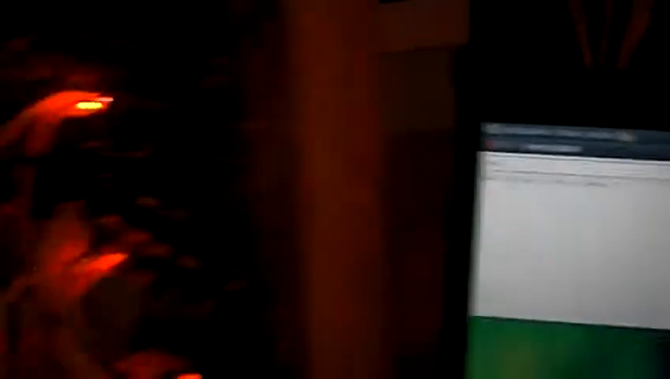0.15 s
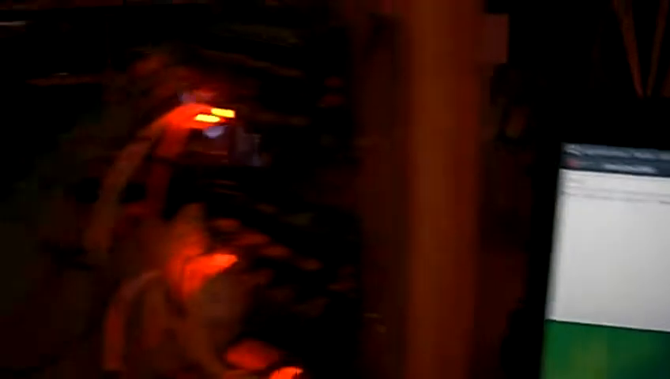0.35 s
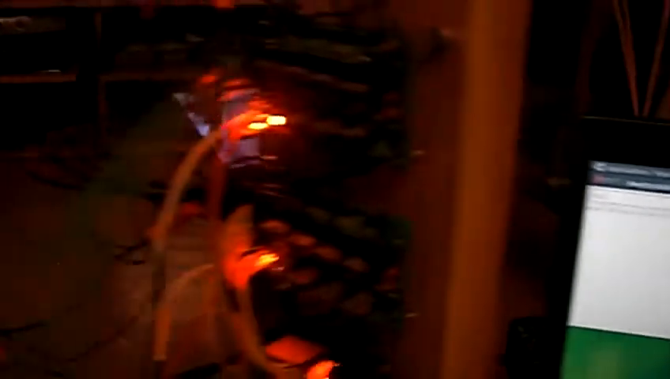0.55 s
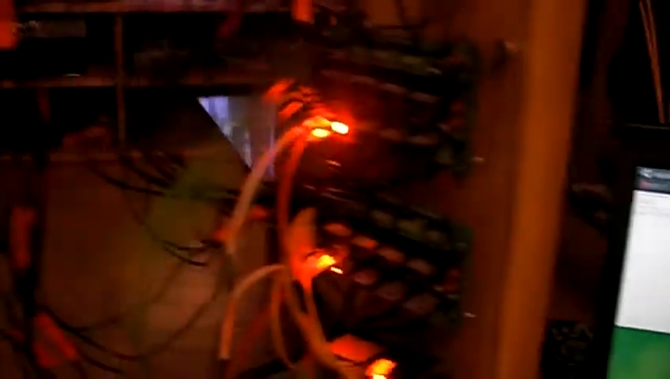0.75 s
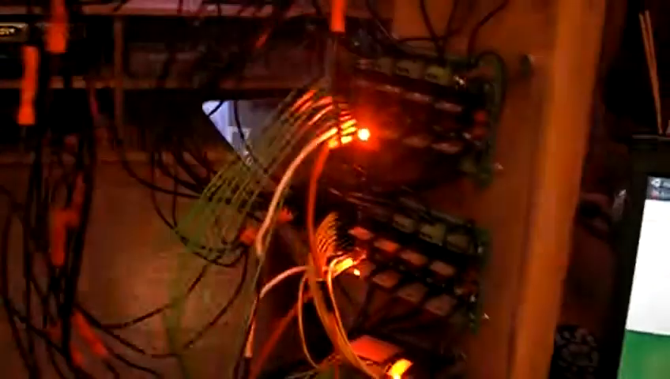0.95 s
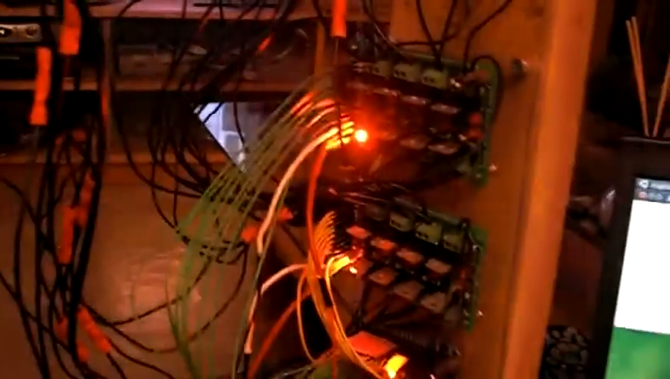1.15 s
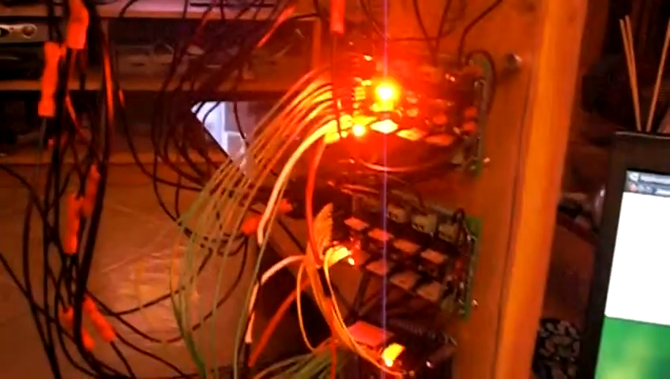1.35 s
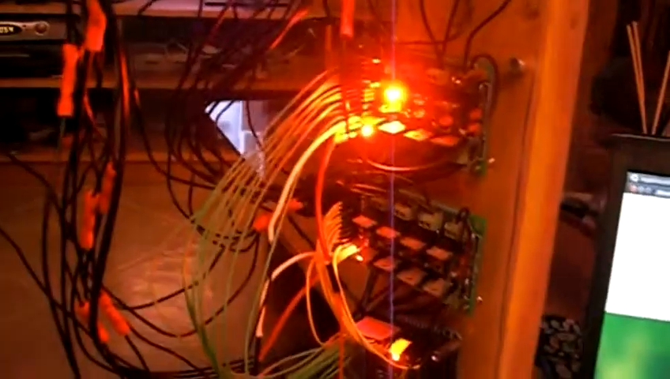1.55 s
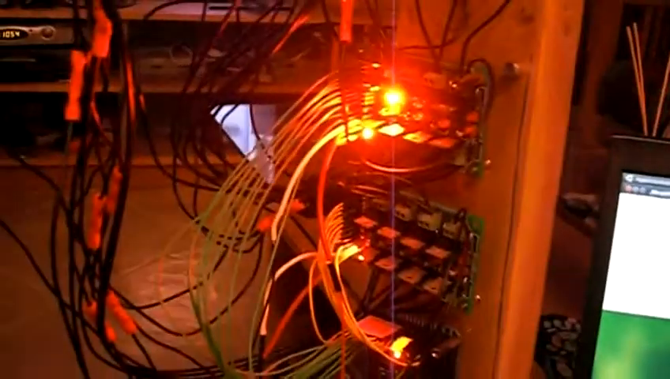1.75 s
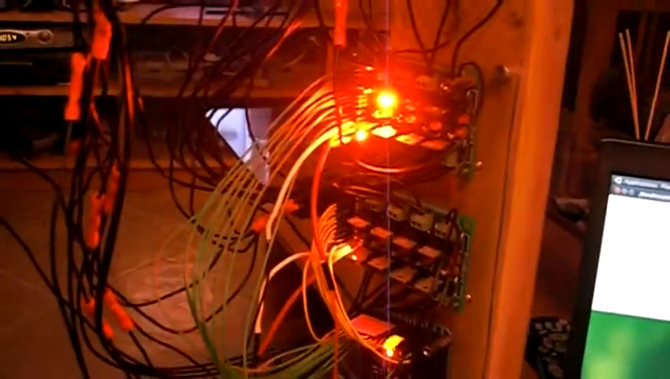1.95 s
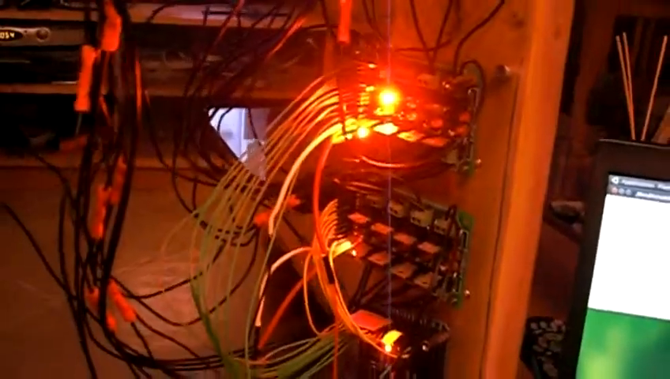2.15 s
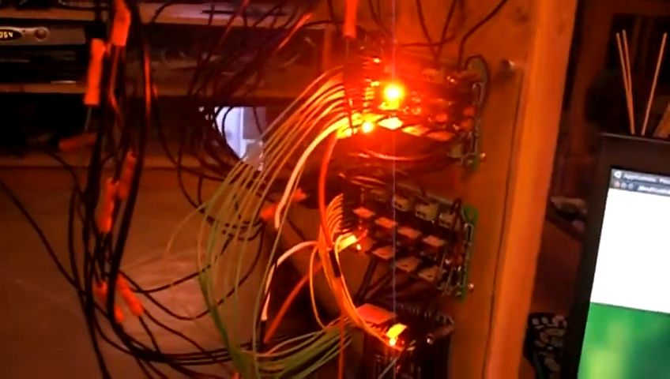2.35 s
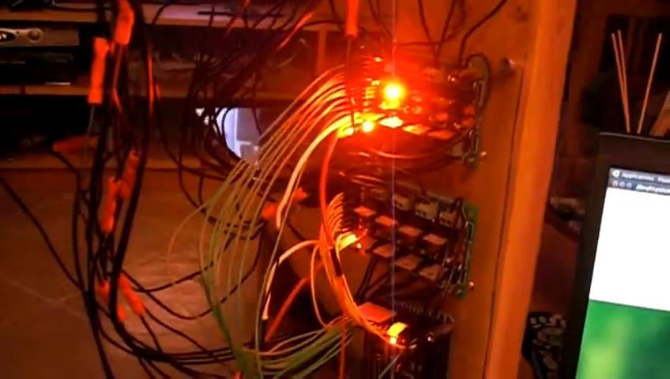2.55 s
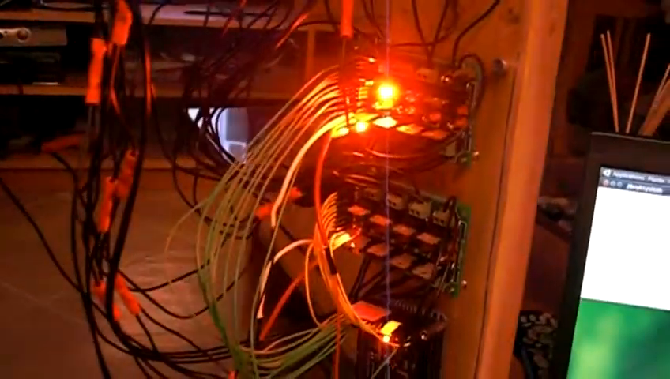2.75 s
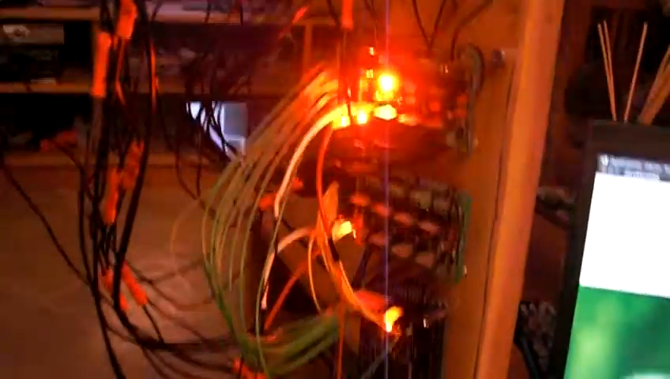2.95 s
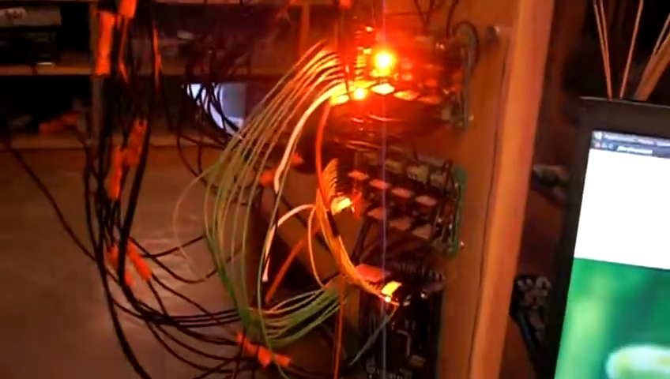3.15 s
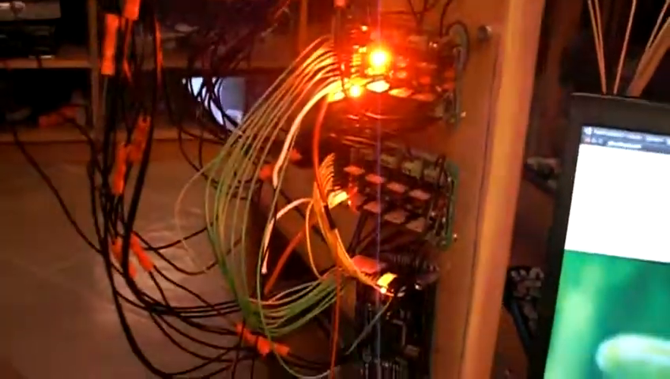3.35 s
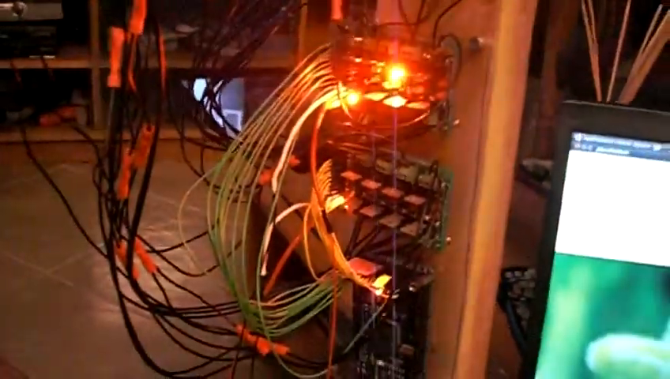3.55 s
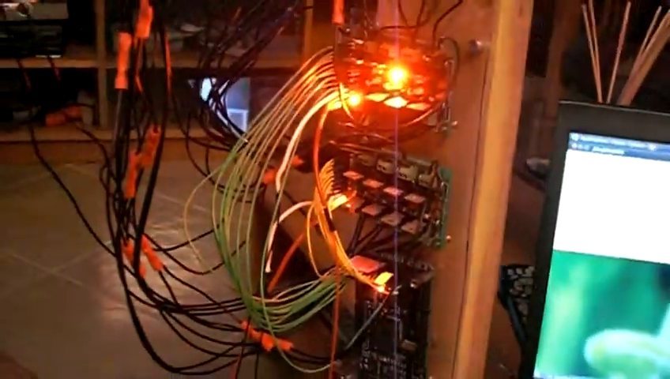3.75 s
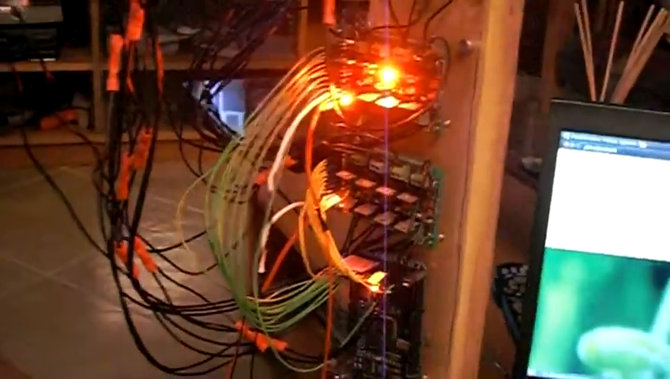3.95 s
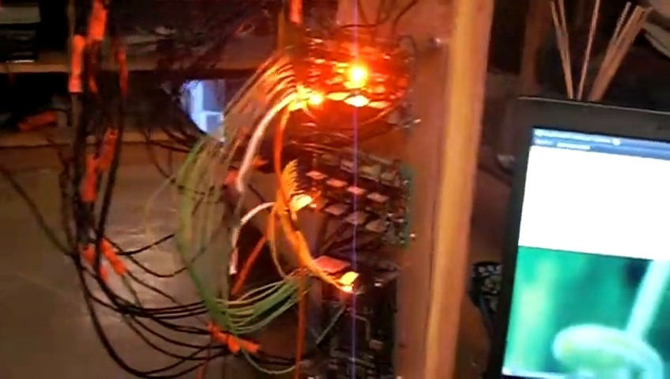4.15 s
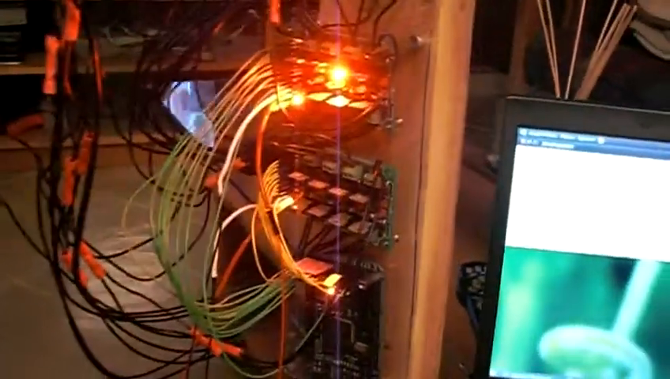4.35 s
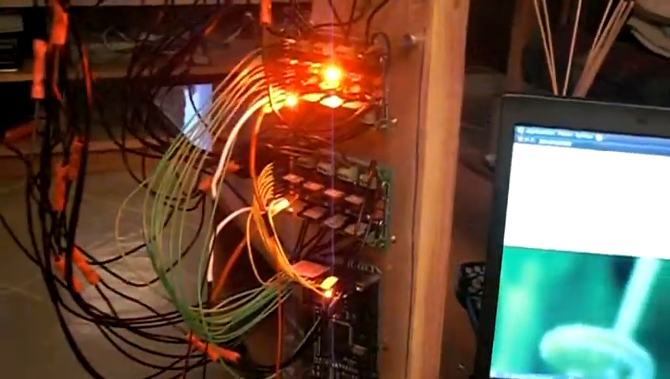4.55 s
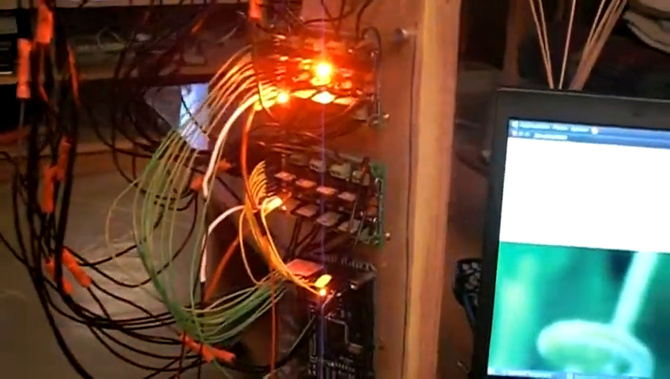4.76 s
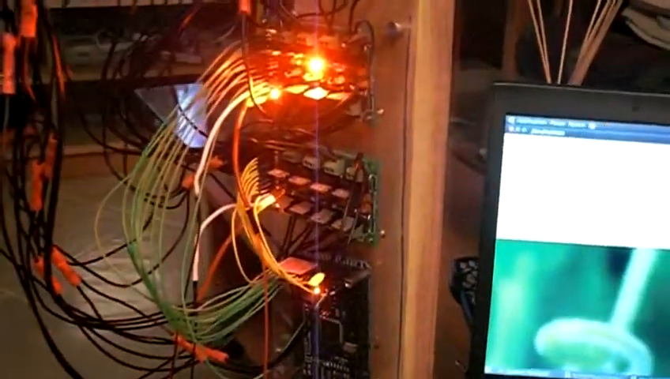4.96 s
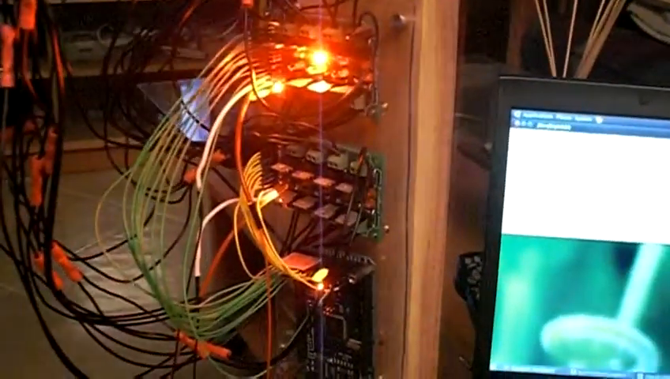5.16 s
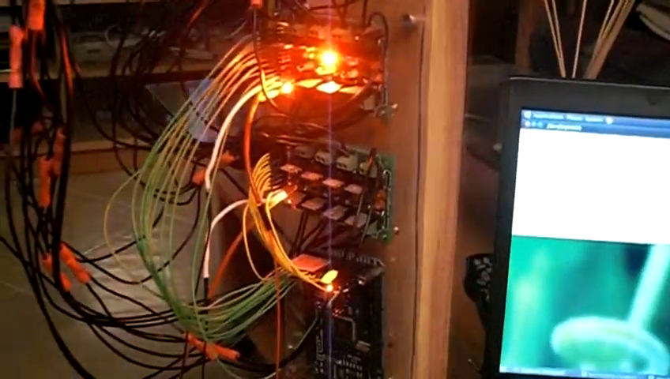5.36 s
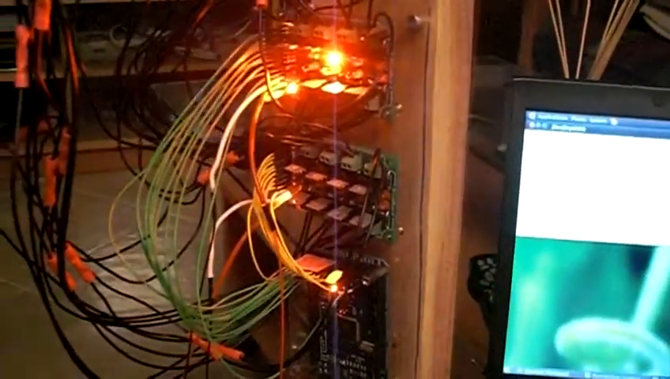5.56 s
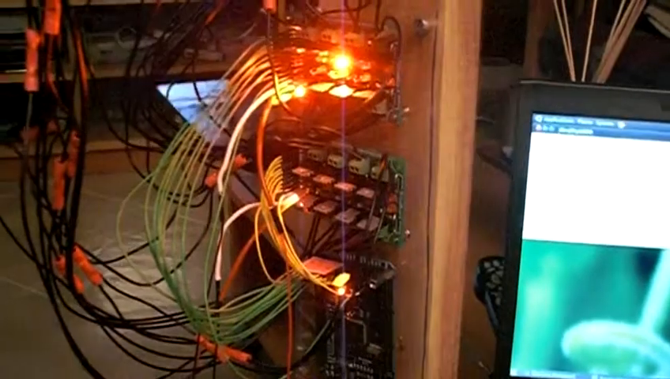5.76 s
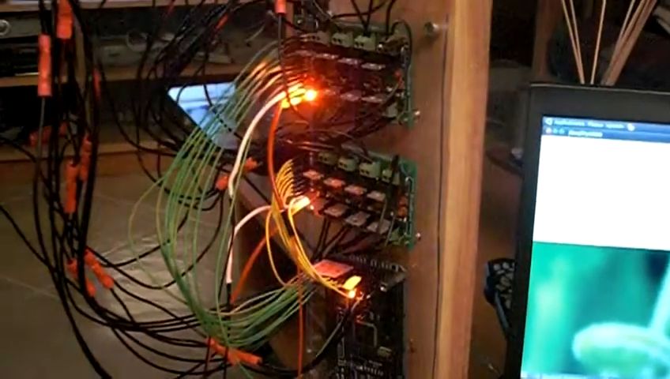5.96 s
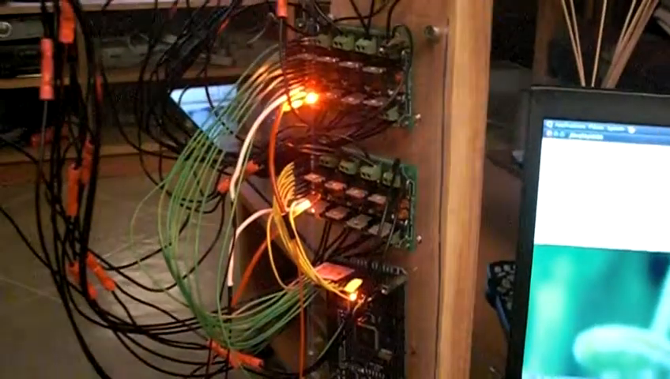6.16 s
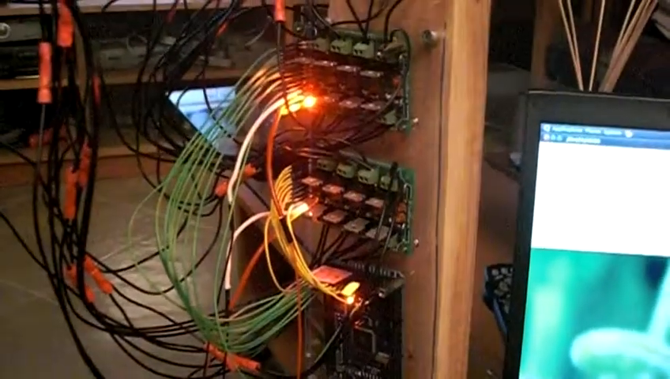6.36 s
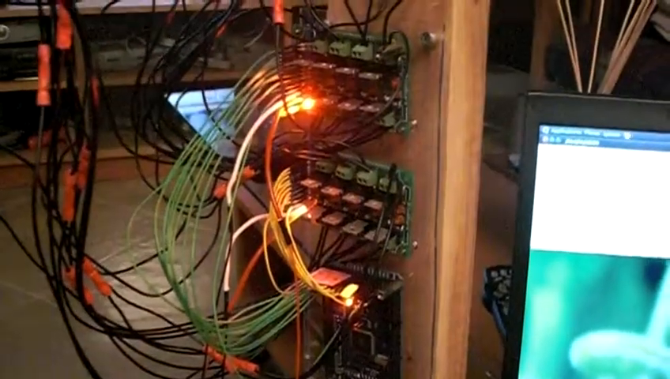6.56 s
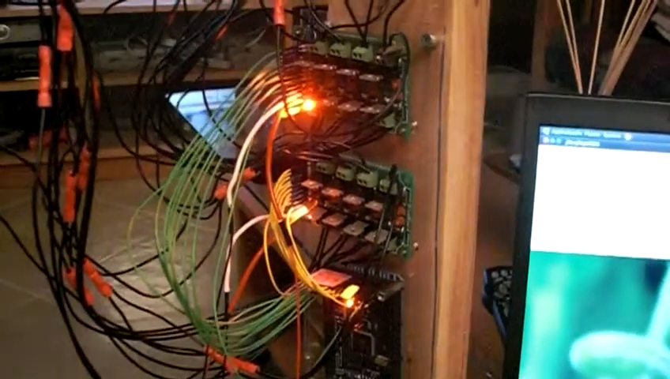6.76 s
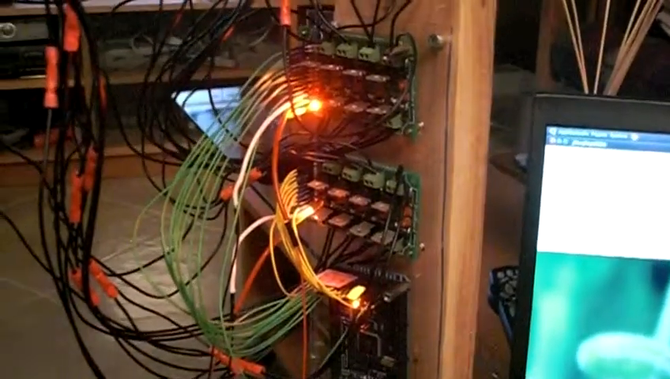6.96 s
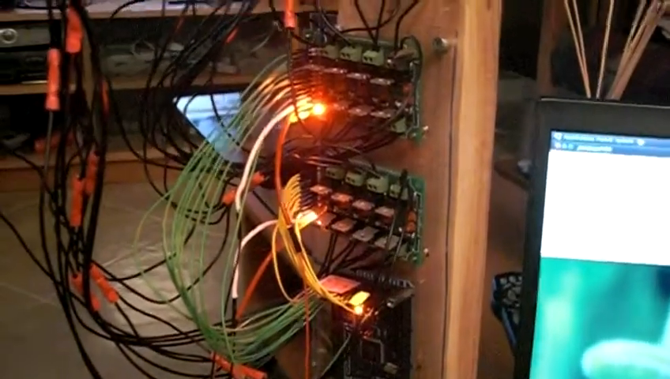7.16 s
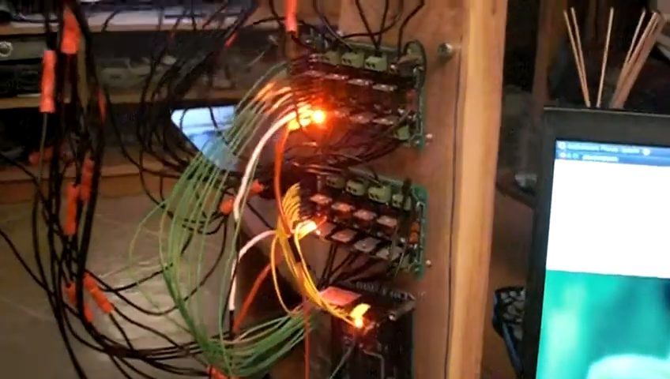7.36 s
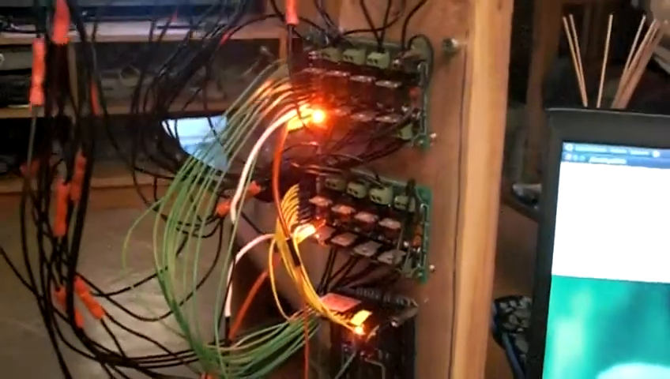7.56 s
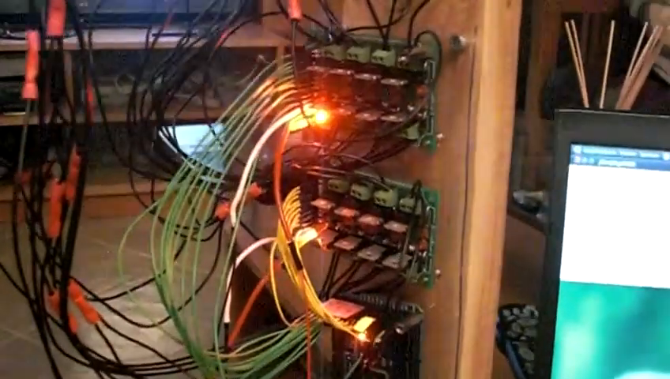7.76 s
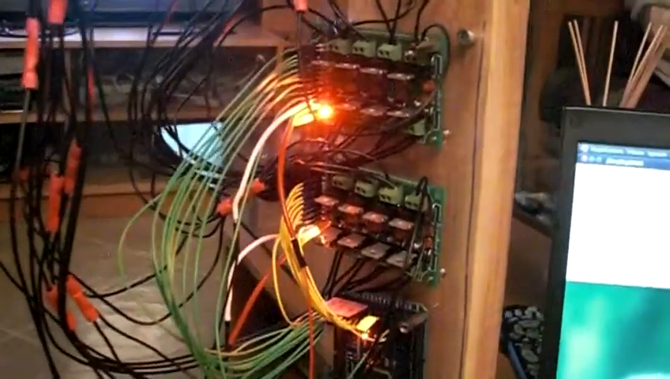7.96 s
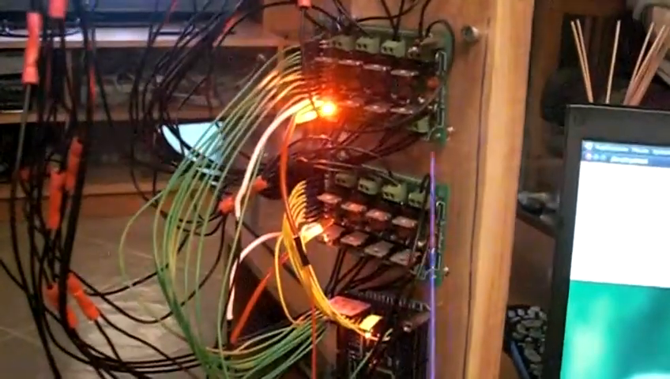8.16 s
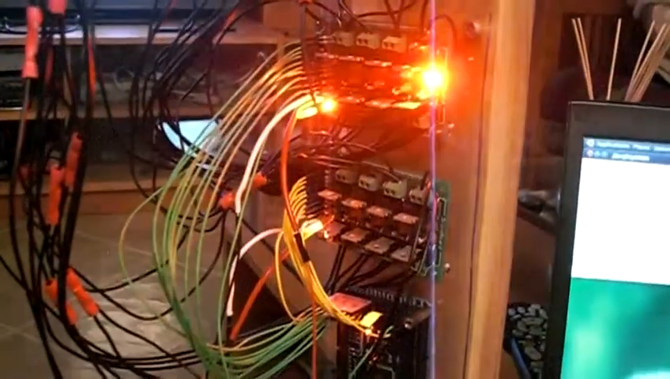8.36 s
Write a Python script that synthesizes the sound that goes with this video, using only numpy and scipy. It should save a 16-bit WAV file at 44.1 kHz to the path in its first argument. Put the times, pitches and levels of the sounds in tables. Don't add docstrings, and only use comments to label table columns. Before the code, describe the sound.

Four spaced relay clacks, the third softer, crack close by against low fan noise, each with a short room ring and faint spring ringing.

```python
import sys
import numpy as np
from scipy import signal
from scipy.fft import rfft, irfft
from scipy.io import wavfile
from scipy.ndimage import uniform_filter1d

SR = 44100
rng = np.random.default_rng(int(sys.argv[2]) if len(sys.argv) > 2 else 0)


def dump(signal):
    limited = np.clip(np.atleast_2d(signal).T, -1, 1)
    pcm = np.round(limited * 32767).astype(np.int16)
    wavfile.write(sys.argv[1], SR, pcm)


def voltage_ratio(decibels):
    exponent = np.asarray(decibels, float) / 20
    return 10 ** exponent


N = 370440


def unit(x):
    return x / np.sqrt(np.mean(x ** 2) + 1e-20)


def along(points, hz):
    point_hz, value = np.transpose(points)
    return np.interp(np.log(hz + 1), np.log(point_hz + 1), value)


def coloured(x, spectrum):
    size = 2048
    level = voltage_ratio(along(spectrum, np.fft.rfftfreq(size, 1 / SR)))
    cepstrum = irfft(np.log(np.maximum(level, 1e-3)))
    cepstrum[1:size // 2] *= 2
    cepstrum[size // 2 + 1:] = 0
    pulse = irfft(np.exp(rfft(cepstrum)))
    return signal.fftconvolve(x, pulse / np.linalg.norm(pulse))[:len(x)]


def band(hz, width_hz, count):
    f = np.fft.rfftfreq(count, 1 / SR)
    resonance = f / (hz * hz - f * f + 1j * f * width_hz + 1e-9)
    return unit(irfft(rfft(rng.standard_normal(count)) * resonance, count))


def add(track, s, sound):
    part = track[round(s * SR):][:len(sound)]
    part += sound[:len(part)]


# (pitch_hz, level_db per Hz)
HUSH = [(18, -52), (30, -36), (46, -18), (69, -1.5), (179, -1.5), (236, -4.5), (361, -5.5), (410, -7.5),
        (988, -11.5), (1270, -13), (3060, -17), (4820, -17.5), (7960, -25.5), (11300, -35), (12200, -39),
        (15900, -68.5), (22000, -120)]
# (pitch_hz, width_hz, level_db)
FAN = [
    (179.7, 23, -70),
    (4460, 240, -80.5),
    (7650, 120, -83.5),
]
# (start_s, end_s, level_db)
RUSTLE = (2.02, 2.3, -72)


def hush():
    t = np.arange(N) / SR
    hush_db = -56.5
    broad = voltage_ratio(hush_db) * unit(coloured(rng.standard_normal(N), HUSH))
    bands = sum(voltage_ratio(db) * band(hz, width, count=N) for hz, width, db in FAN)
    start, end, db = RUSTLE
    progress = np.clip((t - start) / (end - start), 0, 1)
    stroke = np.sin(np.pi * progress ** 0.48) ** .5
    return broad + bands + voltage_ratio(db) * stroke * band(9000, width_hz=6000, count=N)


# (start_s, level_db, t60_s, the time to fade by 60 dB)
KNOCKS = [
    (6.250, -44, 0.33),
    (6.289, -52, 0.24),
    (6.325, -50.5, 0.22),
]
# (pitch_hz, level_db per Hz)
KNOCK = [(35, -35), (60, -7), (140, -8), (354, -7), (393, -5.5), (542, -10.5), (750, -13), (1300, -31),
         (2000, -34), (9000, -47)]


def knocks():
    out, t = np.zeros(N), np.arange(SR // 2) / SR
    for s, db, t60 in KNOCKS:
        noise = unit(coloured(rng.standard_normal(len(t)), KNOCK))
        swell = 1 - np.exp(-t / 0.005)
        add(out, s, voltage_ratio(db - 60 * t / t60) * swell * noise)
    return out


# (start_s, pitch_hz, width_hz, level_db,
# t60_s)
SPRING = [(5.93, 1150, 14, -58, 0.8), (5.918, 2360, 25, -55, 0.63), (5.918, 4400, 40, -49, 0.48),
          (5.918, 4740, 25, -49, 0.51), (8.226, 2910, 90, -50, 0.81), (8.226, 9000, 60, -48, 0.43),
          (1.28, 2334, 60, -54, 0.83), (8.226, 4600, 300, -53, 0.66), (8.2245, 2850, 60, -27.5, 0.034),
          (8.2245, 4575, 60, -27, .035), (8.2245, 7850, 89, -28, .04), (1.2805, 4500, 87, -26, .03),
          (1.2895, 4550, 80, -32, .03)]


def springs():
    out, t = np.zeros(N), np.arange(SR // 2) / SR
    for s, hz, width, db, t60 in SPRING:
        add(out, s, voltage_ratio(db - 60 * t / t60) * band(hz, width, count=len(t)))
    return out


def overshoot(x, hz, damping):
    jf = 1j * np.fft.rfftfreq(len(x), 1 / SR) / hz
    return irfft(rfft(x) * jf ** 2 / (jf ** 2 + damping * jf + 1), len(x))


# (start_s, level_db, direction as a sign, width_s)
BOARDS = [
    (1.2785, -16, -1, 0.0028),
    (3.5930, -26, -1, 0.003),
    (5.918, -41, -1, 0.0022),
    (8.2238, -21.5, 1, 0.0015),
]
# (level_db, pitch_hz)
RACK = [
    (-44.5, 270),
    (-42.5, 244.3),
    (-41, 266),
    (-47.5, 265),
]


def boards():
    out, t = np.zeros(N), np.arange(SR // 2) / SR
    for (s, push_db, direction, width), (hum_db, hum_hz) in zip(BOARDS, RACK):
        bump = np.sin(np.pi * np.clip(t / width, 0, 1)) ** 2
        push = np.sign(direction) * voltage_ratio(push_db) * bump
        swell = 1 - np.exp(-(t / 0.0097) ** 2)
        steady = 0.54 * np.sin(2 * np.pi * hum_hz * t)
        wavering = .75 * band(hum_hz, width_hz=45, count=len(t))
        hum = voltage_ratio(hum_db - 60 * t / 0.56) * swell * (steady + wavering)
        add(out, s, overshoot(push, hz=78.7, damping=.45) + hum)
    return out


def case(points):
    skirt_hz, skirt_db = 15900, -32.5
    return [*points, (skirt_hz, points[-1][-1] + skirt_db)]


# (pitch_hz, t60_s)
ROOM = [(300, .6), (1500, 0.59), (3000, 0.87), (5000, 0.94), (8000, 0.71), (12000, 0.57)]


def room_tail():
    hz, t, z = signal.stft(rng.standard_normal(SR // 2), SR, nperseg=256)
    fade = voltage_ratio(-60 * t / along(ROOM, hz)[:, None])
    tail = signal.istft(z * fade, SR, nperseg=256)[1]
    tail *= 1 - np.exp(-(np.arange(len(tail)) / SR / .016) ** 2)
    return tail / np.linalg.norm(tail)


# (delay_s, level_db)
WALLS = [
    (.0108, -3),
    (.0145, -5),
    (.019, -6),
    (.027, -7),
]
# (start_s, wall_db, room_db)
ANSWERS = [
    (1.2785, -29, -19.5),
    (3.5932, -29, -20.5),
    (5.918, -35, -32.5),
    (8.2238, -36, -21),
    (1.246, -61, -48.5),
]
# (pitch_hz, level_db per Hz)
PULL_FAR = [
    [(710, -48), (1200, -18), (1400, -22.5), (1640, -9.5), (2030, -14), (2300, -6.5), (2740, -10),
     (4580, -1), (5600, -5), (6300, -8.5), (7160, -4), (10100, -18), (11200, -13)],
    [(710, -46), (1200, -12.5), (1390, -22), (1700, -6.5), (1910, -12.5), (2260, -5.5), (4500, -7),
     (5600, -13), (6950, -1.5), (8440, -5.5), (10300, -18.5), (11600, -9)],
    [(710, -40.5), (1200, -22), (1510, -20), (1650, -8), (2130, -16), (2820, -7), (3660, -15), (4810, -5),
     (5460, -12.5), (7160, -1.5), (9670, -13.5), (12200, -12)],
]
# (pitch_hz, level_db per Hz)
SOFT_FAR = [
    [(470, -43), (800, -22), (994, -16), (1140, -2), (1450, -14), (2110, -4.5), (3070, -10.5), (4700, -4),
     (5560, -13), (7650, -11), (12200, -29)],
    [(410, -45.5), (700, -16.5), (2150, -6.5), (2700, -14.5), (3520, 2), (4060, -12.5), (7750, -11),
     (9050, -22), (12200, -23)],
]
BY_RELAY_FAR = [*PULL_FAR[:2], SOFT_FAR[0], PULL_FAR[2], SOFT_FAR[1]]


def workshop():
    out, t = np.zeros(N), np.arange(SR // 20) / SR
    for (s, wall_db, room_db), colour in zip(ANSWERS, BY_RELAY_FAR):
        echo = voltage_ratio(room_db + 16) * room_tail()
        burst_shape = voltage_ratio(-60 * t / .035) * (1 - np.exp(-t / .0008))
        scatter = rng.standard_normal((len(WALLS), len(t))) * burst_shape
        for (delay, db), burst in zip(WALLS, scatter):
            add(echo, delay, voltage_ratio(wall_db + db) * burst)
        add(out, s, coloured(echo, case(colour)))
    return out


# (start_s, peak level_db, chatter t60_s, relay number)
IMPACTS = [(1.2465, -33, .012, 4), (1.2482, -30, .015, 4), (1.2777, -6.5, 0.007, 0),
           (1.2789, -5, 0.0048, 0), (1.2798, -8.5, .003, 0), (1.281, -13.5, 0.024, 0),
           (3.5920, -20.5, 0.012, 1), (3.5932, -10.5, 0.0063, 1), (3.5941, 1, 0.003, 1),
           (3.5945, -10.5, 0.01, 1), (3.5965, -15.5, .02, 1), (5.9043, -16, 0.014, 2),
           (5.9080, -14, 0.016, 2), (5.9186, -20, 0.023, 2), (5.9250, -29, 0.059, 5),
           (5.9292, -31.5, 0.054, 5), (5.938, -35.5, 0.05, 5), (8.2239, -2, 0.0037, 3),
           (8.2249, -9, 0.0056, 3), (8.2248, -10.5, 0.0035, 3), (8.227, -18.5, 0.022, 3)]
# (pitch_hz, level_db per Hz)
PULL_NEAR = [
    [(410, -38), (700, -16.5), (990, -28), (1900, -12), (2840, -8.5), (3650, -12.5), (4520, -3.5),
     (5610, -11.5), (7750, -6), (9380, -16.5), (11500, -15.5)],
    [(290, -21), (500, -12), (1360, -19), (2150, -6.5), (4030, -9), (4540, -7), (6260, -9), (7250, -6),
     (10500, -14.5), (11600, -10.5)],
    [(410, -56), (700, -21.5), (1050, -21), (1780, -7.5), (2290, -9.5), (3010, -0.5), (4420, -0.5),
     (5600, -2.5), (7940, 0.5), (10300, -13), (11900, -12)],
]
# (pitch_hz, level_db per Hz)
SOFT_NEAR = [
    [(410, -59), (700, -33), (1140, -11.5), (1470, -24), (2130, -14.5), (3440, -12.5), (4500, -4),
     (6170, -21), (7660, -10), (8430, -15), (12200, -23)],
    [(410, -47.5), (700, -15), (2150, -7.5), (2700, -12.5), (3520, 2), (4060, -11), (7750, -11),
     (9050, -22), (12200, -21)],
    [(410, -44), (700, -16), (1040, -4), (1490, -13), (1960, 4), (3050, -7.5), (4750, 1), (5750, -14),
     (12200, -34)],
]
BY_RELAY_NEAR = [*PULL_NEAR[:2], SOFT_NEAR[0], PULL_NEAR[2], *SOFT_NEAR[1:]]


def relays():
    out, t = np.zeros(N), np.arange(SR // 20) / SR
    for s, db, t60, relay in IMPACTS:
        decay = voltage_ratio(-60 * t / t60)
        chatter = rng.standard_normal(len(t)) * decay
        chatter *= 0.49 * np.linalg.norm(decay) / np.linalg.norm(chatter)
        chatter[0] = -1.3
        tones = rfft(chatter)
        evenness = unit(uniform_filter1d(np.abs(tones), size=25))
        blow = irfft(tones / evenness, len(t)) * (t < t[-1] / 2)
        add(out, s, voltage_ratio(db) * coloured(blow, case(BY_RELAY_NEAR[round(relay)])))
    panel_s, panel_db, panel_t60_s = .0110, -18.5, 0.0072
    blur = np.sign(rng.standard_normal(len(t))) * voltage_ratio(-60 * t / panel_t60_s)
    echo = signal.fftconvolve(out, blur / np.linalg.norm(blur))[:N]
    add(out, panel_s, voltage_ratio(panel_db) * echo)
    return out


def scene():
    clicks = relays() + workshop()
    ringing = boards() + springs()
    return (clicks + ringing + knocks() + hush())[None]


# (click start_s, level_db)
SMEAR = [
    (1.278, -50.5),
    (3.593, -51),
    (5.904, -61),
    (8.2235, -51),
]


def smear():
    out, t = np.zeros(N), np.arange(SR // 25) / SR
    for s, db in SMEAR:
        broad = band(5000, width_hz=14000, count=len(t))
        edge = 0.8 * band(11950, width_hz=300, count=len(t))
        add(out, s - t[-1], (t / t[-1]) ** 1.7 * voltage_ratio(db) * (broad + edge))
    return out


LOUD_S = [
    1.278,
    3.592,
    8.223,
]


def gain_db():
    rest_db, ducked_db, climb_db_per_s = -.5, -11.5, 4
    fast_share, fast_s, slow_s, hold_s = .4, .012, 0.12, .32
    t = np.arange(N) / SR
    gain = np.full(N, float(rest_db))
    for s in LOUD_S:
        since, before = np.maximum(t - s, 0), gain[round(s * SR)]
        sinking = np.minimum(since, hold_s)
        fast = fast_share * np.exp(-sinking / fast_s)
        slow = (1 - fast_share) * np.exp(-sinking / slow_s)
        climb = climb_db_per_s * (since - sinking)
        after = ducked_db + (before - ducked_db) * (fast + slow) + climb
        gain = np.where(t < s, gain, np.minimum(after, rest_db))
    return gain


def band_limit(x):
    return signal.sosfilt(signal.butter(12, 12360, fs=SR, output="sos"), x)


def record(dry):
    ducked = smear() + dry * voltage_ratio(gain_db())
    hz = np.fft.rfftfreq(N, 1 / SR)
    low_cut = 1 / np.sqrt(1 + (50 / (hz + 1)) ** 8)
    top_hz = 12080
    slope = np.clip((top_hz - hz) / 120 + .5, 0, 1) ** 2
    limit = np.maximum(slope, voltage_ratio(-30) * (hz < 16500))
    return band_limit(irfft(rfft(ducked) * low_cut * limit, N))


dry = scene()
out = record(dry)
dump(out)
```